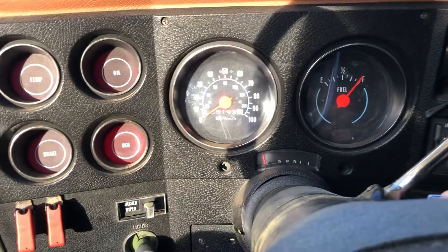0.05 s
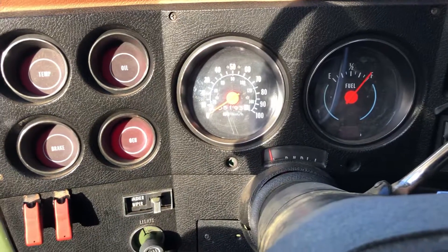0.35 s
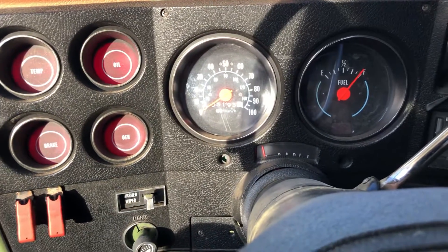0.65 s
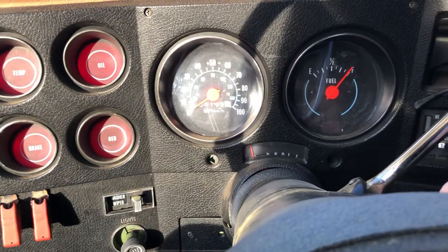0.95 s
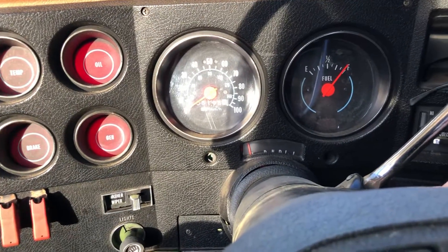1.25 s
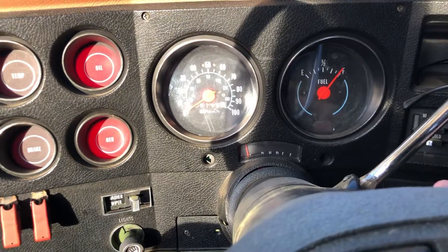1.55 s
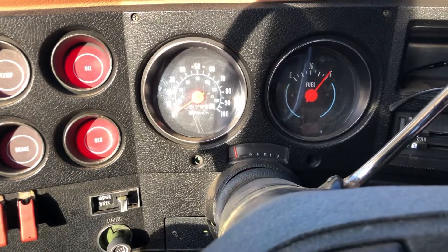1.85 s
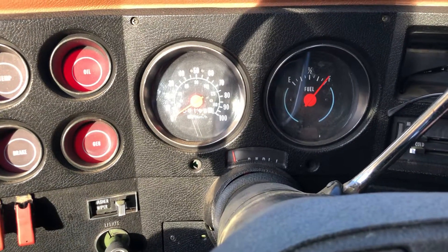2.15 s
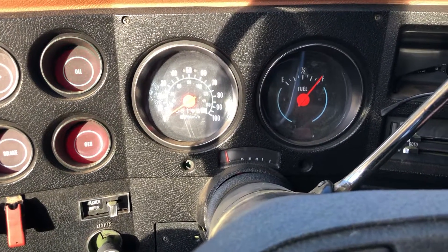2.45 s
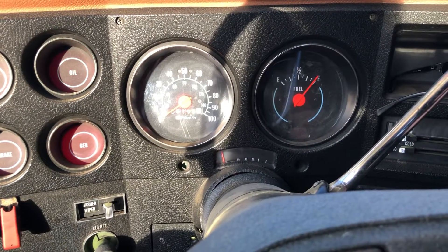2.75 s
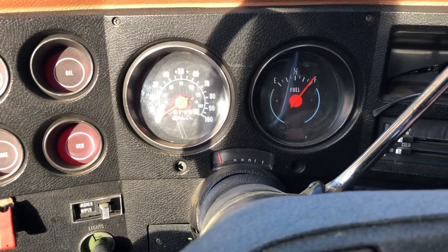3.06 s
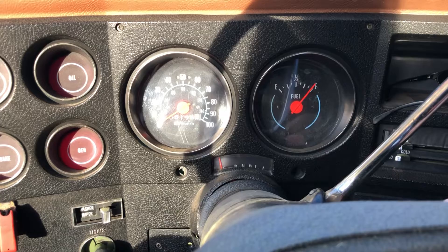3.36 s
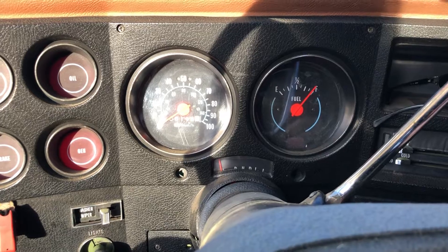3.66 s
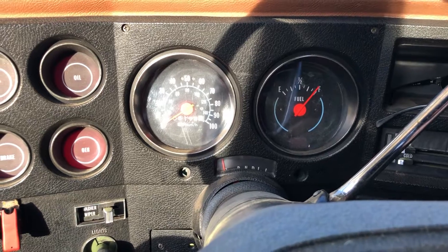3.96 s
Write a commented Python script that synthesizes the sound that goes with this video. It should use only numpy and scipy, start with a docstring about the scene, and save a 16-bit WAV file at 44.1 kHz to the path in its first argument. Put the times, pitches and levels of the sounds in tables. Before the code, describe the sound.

An old vehicle engine starts, heard close from the driver's seat. The ignition lock clacks, keys jingle and the starter whirrs and grinds; then the engine catches, revs up with a hiss and drops to a fast, booming idle.

```python
"""A lock clacks and keys jingle, close to one microphone at the driver's seat. The starter gear clashes
into the flywheel and cranks an old eight-cylinder engine, which coughs, stumbles, then catches, flares
up with a hiss of air and sinks to a fast idle. Its uneven firings boom in the cab and set the panels
roaring; nearby glass and bare metal throw back short echoes."""
import sys
import numpy as np
from scipy import signal
from scipy.fft import rfft, irfft
from scipy.io import wavfile
from scipy.ndimage import uniform_filter1d

SR = 44100
rng = np.random.default_rng(int(sys.argv[2]) if len(sys.argv) > 2 else 0)


def to_wav(s):
    """Save 16-bit WAV."""
    ch = np.atleast_2d(s).T  # columns
    pcm = np.round(np.clip(ch, -1, 1) * 32767)  # PCM
    wavfile.write(sys.argv[1], SR, pcm.astype(np.int16))


N = 176400
T = np.arange(N) / SR

# Table levels are relative: each source sets its own trim.
# The camshaft turns once per eight firings. Each row: time in seconds, its speed in Hz, then the
# two loudest exhaust tones in dB, at the firing rate and at five times camshaft speed.
CAMSHAFT = [(2.06, 4.92, -33, -41), (2.172, 7.36, -24, -49), (2.234, 8.9, -22, -36),
            (2.312, 10.1, -28, -36), (2.36, 10.7, -33, -25), (2.438, 13.9, -36, -46),
            (2.526, 15.7, -25.5, -38), (2.57, 17.0, -32, -30), (2.62, 20.2, -44, -18.5),
            (2.658, 18.3, -34, -23.5), (2.768, 21.8, -26.5, -19.5), (2.842, 21, -37, -27.5),
            (3.026, 19.9, -47, -25.5), (3.096, 21.9, -42, -29), (3.134, 20.5, -36, -32),
            (3.218, 17.5, -32, -27), (3.272, 17.4, -29, -28.5), (3.704, 18.1, -30.5, -32),
            (3.876, 14.2, -45, -31), (4.0, 14, -46, -42)]
# The running engine. Each row: time in seconds, then boom, roar, clatter, hiss and hiss top in dB.
ENGINE_LEVELS = [(2.04, -28, -52, -40, -40.5, -42), (2.072, -29, -43.5, -35, -36, -40.5),
                 (2.258, -23.5, -37, -37, -29, -34.5), (2.302, -19.5, -31.5, -36, -35.5, -37),
                 (2.322, -22, -34, -34, -28, -34.5), (2.344, -22.5, -33.5, -33.5, -32.5, -35.5),
                 (2.52, -19, -29.5, -32.5, -31, -35), (2.716, -23.5, -26.5, -30.5, -33, -39.5),
                 (2.826, -21, -26, -33, -37, -47), (2.924, -20, -27.5, -33.5, -39.5, -46),
                 (3.186, -26, -27.5, -36.5, -42.5, -52.5), (3.306, -23.5, -28.5, -36, -41.5, -51.5),
                 (3.814, -22.5, -30, -37.5, -43, -51.5), (3.9, -25.5, -31, -38, -42.5, -49),
                 (4.0, -23, -35, -39.5, -45, -51.5)]
# Weaker exhaust tones. Each row: multiple of camshaft speed, level in dB against the boom.
EXHAUST_TONES = [(3, -21), (6, -17), (7, -16), (9, -15.5), (10, -14), (12, -18), (15, -17), (18, -16.5),
                 (24, -23)]
# Each cylinder's pulse in dB, in firing order.
CYLINDER_PULSES_DB = [-10.5, -25.5, 3.5, -16.5, -22.5, -2.5, -14, -4.5]
# The engine's spectra at the seat. Each row: frequency in Hz, level in dB.
BOOM_SPECTRUM = [(15, -41), (25, -16), (43, -3.5), (97, -3), (166, -8.5), (200, -16), (260, -19),
                 (340, -79), (570, -120)]
ROAR_SPECTRUM = [(130, -24), (220, -6.5), (263, -1), (296, -0.5), (337, -5.5), (412, 4.5), (457, -7),
                 (503, -2.5), (532, -6), (572, -2.5), (640, 2), (770, -2), (835, -1.5), (996, -2),
                 (1120, -3.5), (1290, -9), (1500, -7), (1950, -28), (3300, -120)]
CLATTER_SPECTRUM = [(740, -9), (1250, 1), (1290, -2), (1430, 4.5), (1810, 2), (1940, 0.5), (2090, -6),
                    (2240, 0.5), (2510, 0.5), (2860, -3), (3800, -7.5), (4940, -49), (8360, -120)]
HISS_SPECTRUM = [(1880, -14), (3200, -3), (3470, -3), (4150, 0), (4570, -5.5), (4890, -3.5), (5290, -6),
                 (7500, -12.5), (9750, -27), (16500, -120)]
HISS_TOP_SPECTRUM = [(4410, -21), (7500, -3), (10700, 0), (13500, -7), (15200, -2.5), (16000, -24)]
# Cranking. Each row: time in seconds, then shudder, gear growl, whirr and whirr top in dB.
STARTER_LEVELS = [(0.79, -29, -35, -36, -65), (0.81, -35, -39, -41, -67), (0.884, -38, -32.5, -41, -59),
                  (0.978, -41.5, -48.5, -35, -45), (1.228, -28.5, -36.5, -27.5, -35.5),
                  (1.266, -36.5, -40, -36.5, -43), (1.318, -32.5, -32.5, -28, -30.5),
                  (1.366, -31, -38, -35, -51), (1.45, -37, -44, -44, -53),
                  (1.716, -40.5, -44.5, -47.5, -57.5), (1.756, -39, -45.5, -42, -52),
                  (1.798, -39.5, -44.5, -46, -57), (1.854, -40, -45.5, -48, -42),
                  (1.882, -37.5, -46.5, -46, -57), (2.004, -37.5, -48, -44, -37.5),
                  (2.04, -37, -44.5, -51, -55)]
# The starter's spectra at the seat. Each row: frequency in Hz, level in dB.
CLASH_SPECTRUM = [(53, -36), (90, -4.5), (184, -9), (488, -19.5), (690, -3), (1160, -13.5), (1540, -5.5),
                  (1680, -14), (2090, -5), (2430, -15), (2890, -11), (3430, -13.5), (4960, -12.5),
                  (5300, -12), (16000, -34.5)]
SHUDDER_SPECTRUM = [(15, -50), (25, -6), (49, 1.5), (86, -7), (124, -3), (161, -7.5), (211, -10.5),
                    (241, -13), (300, -17), (390, -35), (660, -120)]
GROWL_SPECTRUM = [(150, -36), (250, -10.5), (361, -4), (537, -10), (730, 2.5), (787, -9.5), (868, 2),
                  (971, -9.5), (1060, -7.5), (1340, -17), (1500, -14.5), (1950, -8), (3300, -120)]
WHIRR_SPECTRUM = [(760, -17), (1300, -7), (1610, 1), (1930, -4), (2080, -5.5), (2340, -1.5), (2830, 0.5),
                  (3520, 1), (3960, 3), (5350, -3), (7020, -7), (7500, -30), (9750, -38), (16500, -120)]
WHIRR_TOP_SPECTRUM = [(4410, -18), (7500, 0), (7920, -3.5), (11000, -5), (15000, -12), (16000, -17)]
RASP_SPECTRUM = [(710, -17), (1200, -4), (2250, -5.5), (2450, -0.5), (2980, -14), (4040, -3.5), (5350, -13),
                 (7740, -8), (16000, -16)]
# Lock, keys and quiet cab at the microphone. Each row: frequency in Hz, level in dB.
LOCK_SPECTRUM = [(53, -36), (90, 12), (266, 2), (568, -4.5), (1020, 3), (1160, -10), (1640, 4),
                 (2040, -2.5), (3220, 0), (5530, -4), (7660, 0.5), (8910, -5), (11600, -10.5), (14700, -5),
                 (16000, -18)]
KEY_SPECTRUM = [(3000, 0), (8000, 2.5), (12000, 2), (15800, -2)]
CAB_SPECTRUM = [(18, -54), (30, -27), (86, -6), (134, -25), (161, -9), (174, -3), (194, 2), (239, -15.5),
                (426, -25.5), (600, -15.5), (666, -17.5), (1250, -16.5), (2480, -31), (4420, -39),
                (7270, -50), (16000, -56)]
# Resonances of the panels, the clashing gear, the cab rattled by the starter, the lock and the keys.
# Each row: centre in Hz, width in Hz, lift in dB.
PANEL_MODES = [(287, 33, 9.5), (437, 14, 1), (613, 84, 5), (848, 13, 5.5), (1148, 40, 6), (1470, 30, -1),
               (1823, 18, 5), (2083, 110, 8), (2510, 160, 2), (4230, 38, 1.5)]
CLASH_MODES = [(174, 14, 15.5), (603, 18, 9.5), (710, 25, 5), (1510, 44, 5), (2200, 49, 5.5),
               (2640, 45, 11.5), (2880, 46, 9), (4820, 240, 4)]
RASP_MODES = [(1850, 80, 5), (4150, 200, 6), (6800, 200, 5), (10900, 400, 4)]
LOCK_MODES = [(1020, 52, 1), (1740, 73, -0.5), (4320, 80, 3), (5500, 80, 5), (7840, 110, 3)]
KEY_RING_MODES = [(4300, 90, 14), (5400, 90, 10), (6550, 110, 8), (7630, 120, 16), (9030, 130, 10),
                  (12870, 200, 6), (14240, 200, 12), (14800, 180, 17), (14860, 200, 14)]
# Rasps of the starter drive, snaps of the lock. Each row: start and hold in seconds, level in dB.
DRIVE_RASPS = [(1.216, 0.0066, -40), (1.299, .016, -39), (1.737, 0.021, -42), (1.824, 0.027, -46.5),
               (1.907, 0.021, -41.5), (1.974, 0.013, -32.5)]
SNAPS = [(0.037, .001, -55.5), (0.475, .002, -54.5), (0.52, 0.021, -52.5), (0.556, 0.0054, -26),
         (0.598, 0.018, -54), (0.653, .008, -40)]
# Engine jolts. Each row: start in seconds, pitch in Hz, peak in dB, 60 dB decay in seconds.
ENGINE_COUGHS = [(0.779, 140, -22, 0.15), (0.872, 128, -32, 0.18), (1.156, 71, -26, 0.11),
                 (1.224, 51.6, -19.5, 0.18), (1.35, 123.2, -21.5, 0.3), (2.546, 127, -15.5, 0.049)]
# The key squeaks. Each row: start in seconds, level in dB, end pitch in Hz, uncapped decay in seconds.
KEY_SQUEAKS = [(0.6243, -30, 877, 0.075), (0.68, -24.5, 858, 0.026), (1.283, -25.5, 1610, 0.017)]
# Keys touch on the ring. Each row: start in seconds, level in dB.
KEY_TOUCHES = [(0.564, -22), (0.5891, -44), (0.6185, -31), (0.6357, -25.5), (1.2855, -23.5), (1.3102, -21),
               (1.3593, -28), (1.3808, -26.5), (1.4077, -33), (1.4345, -27), (1.4641, -37), (1.4885, -36),
               (1.5444, -32.5), (1.593, -36), (1.6666, -43), (1.7599, -34), (1.8138, -38)]
# Loose metal. Each row: start and hold in seconds, pitch and width in Hz, level in dB.
METAL_BUZZES = [(1.208, 0.011, 4000, 200, -29), (2.16, 0.085, 1830, 46, -36.5),
                (2.585, 0.023, 4230, 90, -30.5), (2.687, 0.044, 4300, 90, -36.5),
                (2.68, .12, 2030, 40, -37.5)]


def engine():
    """Eight uneven firings a cycle drive exhaust tones, cab boom, panel roar, clatter and hiss."""
    boom, roar, clatter, hiss, hiss_top = levels(ENGINE_LEVELS, fade_in_s=0.017, fade_out_s=0.1)
    cam = np.array(CAMSHAFT)
    firing_gain, fifth_gain = levels(np.delete(cam, 1, axis=1), fade_in_s=0.02, fade_out_s=0.1)
    cam_hz = np.interp(T, cam[:, 0], cam[:, 1]) * (1 + 0.00361 * drift(10.3))
    cycles = np.cumsum(cam_hz) / SR
    firings = 8 * cycles
    fired = np.flatnonzero(np.diff(np.floor(firings)))
    pulses = np.zeros(N)
    pulses[fired] = from_db(np.resize(CYLINDER_PULSES_DB, len(fired)) + rng.normal(0, 4, len(fired)))

    out = firing_gain * np.sin(2 * np.pi * firings) + fifth_gain * np.sin(2 * np.pi * 5 * cycles)
    out *= np.sqrt(2) * from_db(1.05 * drift(25) - 0.9)
    for multiple, db in EXHAUST_TONES:
        # the cab passes little of a tone below its lowest resonance
        gain = from_db(db + 2 * drift(12)) / (1 + (45 / (multiple * cam_hz)) ** 6)
        out += boom * gain * np.sin(2 * np.pi * (multiple * cycles + rng.random()))

    exhaust = colour(noise() * throb(firings, depth=0.52), BOOM_SPECTRUM, modes=[(97, 120, -3.5)])
    out += from_db(-5.5) * boom * steady(exhaust, 0.058)
    shaking = 0.23 * rms_one(pulses) + noise() * throb(firings, depth=0.1)
    out += from_db(-0.52) * roar * steady(colour(shaking, ROAR_SPECTRUM, PANEL_MODES), 0.13)
    knocks = contacts(7000) * throb(firings, depth=0.078) * throb(cycles, depth=0.054)
    out += from_db(-0.98) * clatter * colour(knocks, CLATTER_SPECTRUM, PANEL_MODES)
    air = noise() * throb(firings, depth=0.14) * from_db(0.9 * drift(23))  # the hiss flickers
    out += from_db(-0.15) * hiss * colour(air, HISS_SPECTRUM, PANEL_MODES)
    return out + from_db(-1.56) * hiss_top * colour(air, HISS_TOP_SPECTRUM)


def starter():
    """The gear clashes in, then its teeth whirr and growl while the engine shudders on its mounts."""
    shudder, growl, whirr, whirr_top = levels(STARTER_LEVELS, fade_in_s=0.057, fade_out_s=0.05)
    clash_s, tooth_hz = 0.7017, 125
    teeth = np.cumsum(tooth_hz * (1 + 0.12 * drift(4.23))) / SR
    strike = burst(clash_s, 0.033, 0.013, 0.22) + from_db(-25) * burst(clash_s, 0.0039, 0.0071, 0.078)
    clash = from_db(-21.5) * strike * colour(contacts(6000), CLASH_SPECTRUM, CLASH_MODES)
    gears = growl * colour(noise() * throb(teeth, depth=0.28), GROWL_SPECTRUM)
    mesh = contacts(14000, spread_db=2) * throb(teeth, depth=0.1)
    gears += from_db(-2.57) * whirr * colour(mesh, WHIRR_SPECTRUM, PANEL_MODES)
    gears += from_db(-3) * whirr_top * colour(mesh, WHIRR_TOP_SPECTRUM)
    rasping = sum(from_db(db) * burst(start, 0.011, hold, 0.052) for start, hold, db in DRIVE_RASPS)
    rasps = rasping * colour(contacts(8000), RASP_SPECTRUM, RASP_MODES)
    rumble = from_db(1) * shudder * steady(colour(noise(), SHUDDER_SPECTRUM), 0.038)
    return clash + gears + rasps + rumble


def coughs():
    """The engine jolts, and single low thumps reach the seat through the body."""
    return sum(from_db(db) * burst(start, 0.0088, 0.003, t60) * np.sin(2 * np.pi * hz * (T - start))
               for start, hz, db, t60 in ENGINE_COUGHS)


def ignition_lock():
    """The lock snaps over; the key squeaks in the barrel, dropping at once to a short ring."""
    snaps = sum(from_db(db) * burst(start, 0.0028, hold, 0.13) for start, hold, db in SNAPS)
    out = snaps * colour(contacts(9000, spread_db=4), LOCK_SPECTRUM, LOCK_MODES)
    start_hz, fall_s = 2500, 0.0016
    for start, db, end_hz, t60 in KEY_SQUEAKS:
        age = np.maximum(T - start, 0)
        hz = end_hz + (start_hz - end_hz) * np.exp(-age / fall_s)
        phase = 2 * np.pi * np.cumsum(hz) / SR + 0.25 * drift(400)
        bright_onset = 0.5 * np.exp(-age / 0.005) * np.sin(3 * phase)
        squeak = np.sin(phase) + 0.46 * np.sin(1.76 * phase) + bright_onset
        out += from_db(db) * burst(start, 0.0023, 0.0056, min(t60, 0.045)) * squeak
    return out


def key_ring():
    """Each touch is a dry tick, then a short shimmer as the keys chatter against each other."""
    tick_gain = sum(from_db(db) * burst(start, 0.0005, 0.001, 0.023) for start, db in KEY_TOUCHES)
    power = sum((from_db(db) * burst(start, 0.0017, 0.0018, 0.1)) ** 2 for start, db in KEY_TOUCHES)
    ticks = tick_gain * colour(noise(), KEY_SPECTRUM)
    shimmer = np.sqrt(power) * steady(colour(noise(), KEY_SPECTRUM, KEY_RING_MODES), 0.013)
    return from_db(-9) * ticks + from_db(-11) * shimmer


def loose_metal():
    """Loose metal rings out in brief, narrow buzzes."""
    out = np.zeros(N)
    for start, hold, hz, width, db in METAL_BUZZES:
        buzz = ring(noise(), hz, t60=np.log(1000) / np.pi / width)
        out += from_db(db) * burst(start, 0.0054, hold, 0.25) * steady(buzz, 0.025)
    return out


def cab_echoes(x):
    """Glass and bare metal near the microphone add close echoes that comb the treble."""
    delays_s = rng.uniform(0.002, 0.022, size=14)
    gains = rng.choice([-1, 1], 14) * np.exp(-delays_s / 0.014)
    gains /= np.linalg.norm(gains)
    echoes = sum(gain * np.pad(x, (int(delay * SR), 0))[:N] for delay, gain in zip(delays_s, gains))
    return x + 0.5 * signal.sosfilt(signal.butter(2, 1200, "high", fs=SR, output="sos"), echoes)


def cab_tone():
    """The quiet background of the cab, with a faint, wavering hum."""
    hum = sum(from_db(db) * rms_one(ring(noise(), hz, t60=0.16)) for hz, db in [(97, -59), (188, -67)])
    return from_db(-50.5) * colour(noise(), CAB_SPECTRUM) + hum


def from_db(db):
    return 10 ** (np.asarray(db) / 20)


def rms_one(x):
    return x / np.sqrt(np.mean(x ** 2) + 1e-20)


def noise():
    return rng.standard_normal(N)


def drift(rate_hz):
    """A smooth random wander with spread 1."""
    step = 40
    pole = np.exp(-2 * np.pi * rate_hz * step / SR)
    slow = signal.lfilter([1], [1, -2 * pole, pole * pole], rng.standard_normal(N // step + 2002))[2000:]
    return np.interp(np.arange(N) / step, np.arange(len(slow)), rms_one(slow))


def levels(rows, fade_in_s, fade_out_s):
    """Gains from the dB columns of a curve, fading outside its span."""
    times, *columns = np.transpose(rows)
    gate = np.exp(-np.maximum(times[0] - T, 0) / fade_in_s - np.maximum(T - times[-1], 0) / fade_out_s)
    return [gate * from_db(np.interp(T, times, db)) for db in columns]


def colour(x, spectrum, modes=()):
    """Pass a sound through a body with steep band edges and narrow resonances; rms 1."""
    f = np.maximum(np.arange(N // 2 + 1) * SR / N, 1)
    hz, db = np.transpose(spectrum)
    gain = from_db(np.interp(np.log(f), np.log(hz), db))
    gain /= (1 + (hz[0] / f) ** 12) * (1 + (f / hz[-1] / 1.05) ** 24)
    for centre, width, lift in modes:
        gain = gain * (1 + (from_db(lift) - 1) / (1 + 2j * (f - centre) / width))
    return rms_one(irfft(rfft(x) * gain, N))


def contacts(per_s, spread_db=1):
    """Random metal contacts of uneven size; rms 1."""
    clicks = (rng.random(N) < per_s / SR) * rng.choice([-1, 1], N)
    return rms_one(clicks * from_db(spread_db * np.minimum(rng.exponential(1, N), 4)))


def burst(start, rise, hold, t60):
    """An envelope that rises, holds, then falls 60 dB in t60; all in seconds."""
    age = T - start
    return np.clip(age / rise, 0, 1) * from_db(-60 * np.maximum(age - rise - hold, 0) / t60)


def ring(drive, hz, t60):
    """One resonance: a unit click sets a sine of height 1 ringing."""
    pole, angle = from_db(-60 / (t60 * SR)), 2 * np.pi * hz / SR
    return signal.lfilter([0, np.sin(angle)], [1, -2 * pole * np.cos(angle), pole * pole], drive + 1e-18)


def throb(turns, depth):
    """A swell once per turn; rms 1."""
    return rms_one(np.exp(depth * np.cos(2 * np.pi * turns)))


def steady(x, window_s):
    """Even out slow swings in level."""
    return x / np.sqrt(uniform_filter1d(x ** 2, int(window_s * SR)) + 1e-9)


def scene():
    """One microphone at the driver's seat, the same in both channels."""
    echoing = cab_echoes(starter() + engine() + key_ring())
    return np.tile(echoing + ignition_lock() + coughs() + loose_metal() + cab_tone(), (2, 1))


def record(dry):
    """A low cut at 33 Hz and a steep high cut at 16.1 kHz on the microphone."""
    low_cut = signal.sosfilt(signal.butter(6, 33, "high", fs=SR, output="sos"), dry)
    return signal.sosfilt(signal.ellip(10, 0.2, 80, 16100, fs=SR, output="sos"), low_cut)


dry = scene()
out = record(dry)
to_wav(out)
```